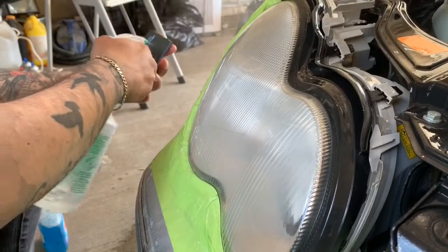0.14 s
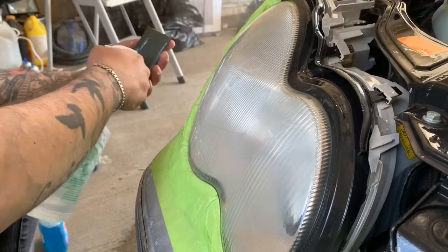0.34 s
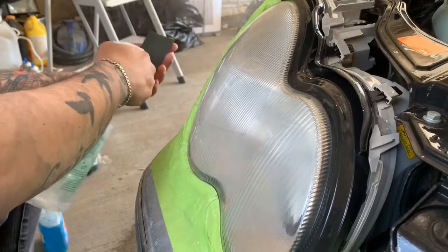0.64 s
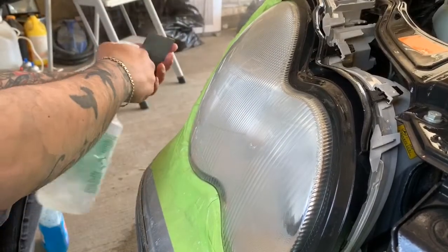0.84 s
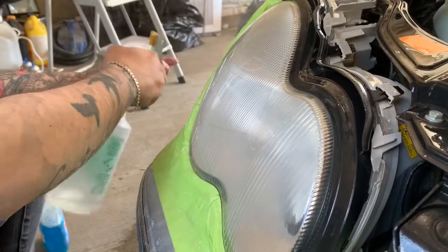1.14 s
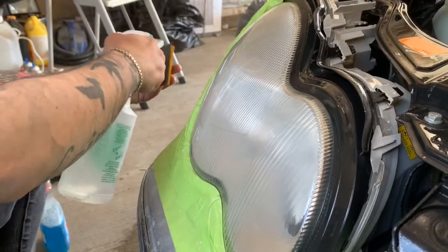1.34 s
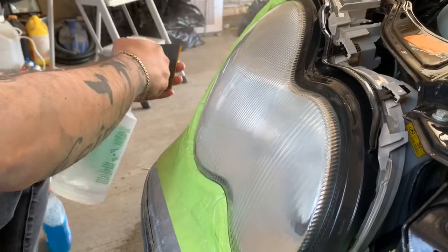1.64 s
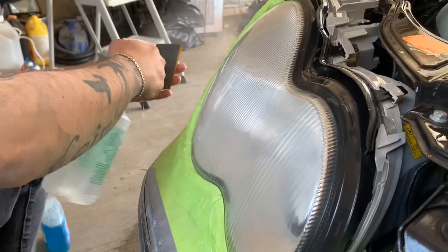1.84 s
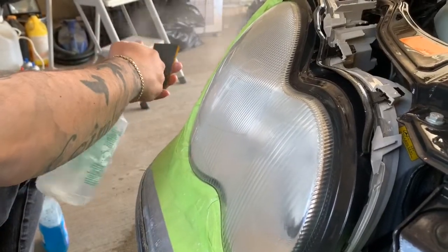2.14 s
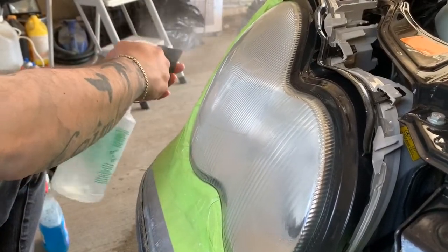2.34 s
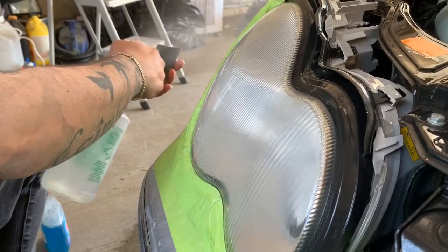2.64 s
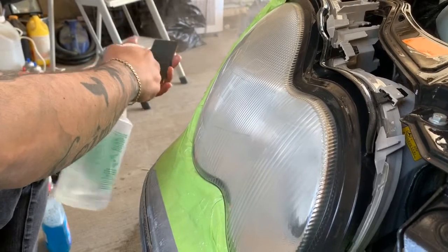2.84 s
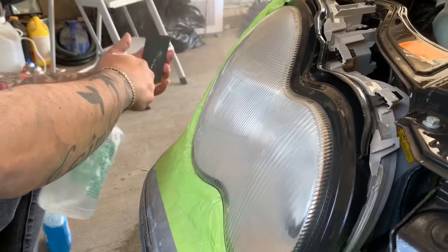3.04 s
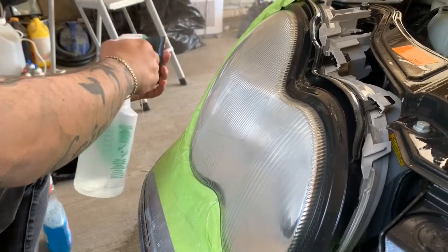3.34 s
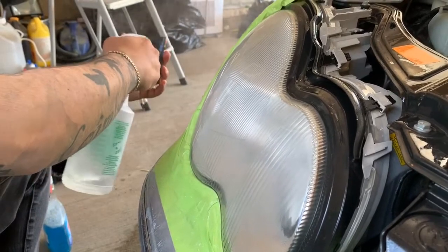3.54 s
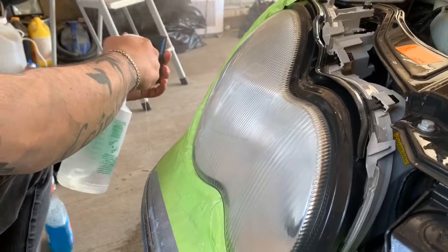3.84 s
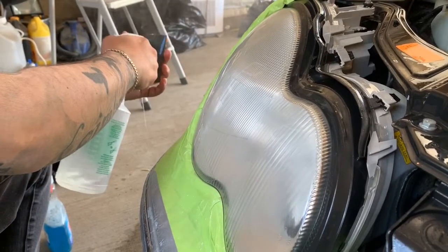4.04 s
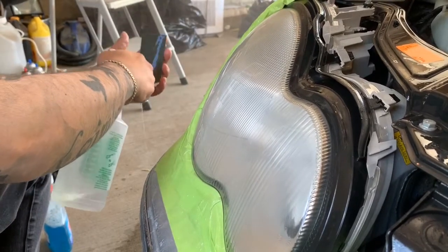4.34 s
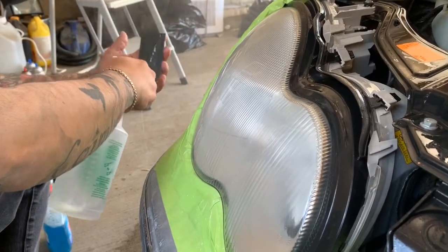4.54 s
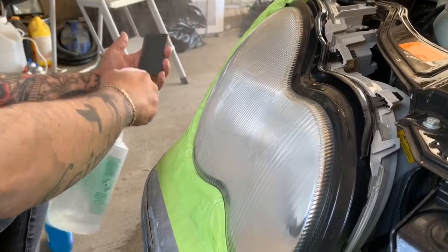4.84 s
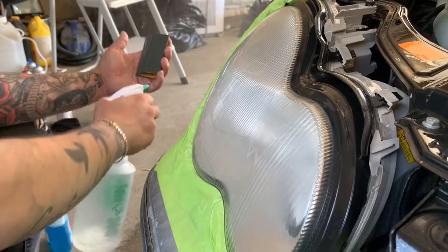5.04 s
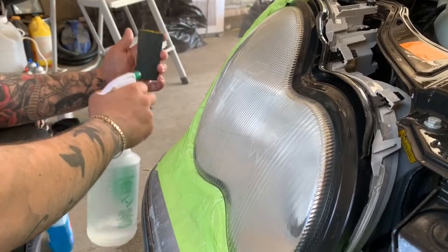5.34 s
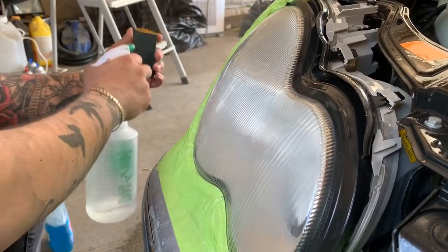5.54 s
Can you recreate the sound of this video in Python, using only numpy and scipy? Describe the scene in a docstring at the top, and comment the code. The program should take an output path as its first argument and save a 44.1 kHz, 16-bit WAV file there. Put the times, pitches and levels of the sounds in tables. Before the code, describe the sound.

Fourteen brisk squirts of water strike a sponge in a cupped hand, bright and hissy at first, hollower and more resonant later. Between them come airy suction, small gurgles and clicking plastic, loudest around the middle. A faint low drone, perhaps an engine outside, wavers from about two seconds over soft room noise. The sound is close, mono, and lightly reverberant; spraying stops before the end.

```python
"""A hand-trigger spray bottle squirts water at a sponge held in a cupped hand, in a garage, in mono.
Pulls hiss, and most thump the bottle: shaped noise under a pressure curve, coloured by nozzle and hand.
Releases suck liquid back up the pump: a softer wheeze of noise, with gurgles; struck plastic modes tick.
A low wavering drone of sine tones, perhaps an engine outside, comes and goes over noise for the room."""
import sys
import numpy as np
from scipy import signal
from scipy.fft import rfft, irfft, next_fast_len
from scipy.io import wavfile
from scipy.ndimage import uniform_filter1d, map_coordinates

SR = 44100
rng = np.random.default_rng(int(sys.argv[2]) if len(sys.argv) > 2 else 0)


def generate_wav(signal):
    """Clip the signal to [-1, 1] and save it as 16-bit WAV at the path in sys.argv[1]."""
    frames = np.transpose(np.atleast_2d(signal))
    scaled = np.clip(frames, -1, 1) * 32767
    pcm = np.round(scaled).astype(np.int16)
    wavfile.write(sys.argv[1], SR, pcm)


N = 250576


def amp(db):
    """Decibels to gain."""
    return 10 ** (np.asarray(db) / 20)


def unit(x):
    """Scaled to rms 1."""
    return x / np.sqrt(np.mean(x ** 2) + 1e-20)


def along(points, hz):
    """Values at hz from (frequency [Hz], value) points, joined on a log frequency axis."""
    f, v = np.transpose(points)
    return np.interp(np.log(hz + 1), np.log(f + 1), v)


def curves(rows):
    """One value per sample for each column after the time."""
    s, *cols = np.transpose(rows)
    return [np.interp(np.arange(N) / SR, s, c) for c in cols]


def strokes(tables, opens_s, closes_s):
    """Curves of separate strokes: a gain that opens fast and is silent around each, then the other columns."""
    rows = []
    for table in tables:
        first, last = table[0], table[-1]
        before = (first[0] - opens_s, -100, *first[2:])
        after = (last[0] + closes_s, -100, *last[2:])
        rows += [before, *table, after]
    rows = np.array(sorted(map(tuple, rows)))
    rows[:, 1] = amp(rows[:, 1] / 2)  # fades run straight in the square root of gain
    root, *others = curves(rows)
    return root ** 2, *others


def wobble(rate):
    """A smooth random curve, rate knots a second."""
    knots = rng.standard_normal(int(N * rate / SR) + 4)
    return map_coordinates(knots, [np.arange(N) * rate / SR])


def filtered(x, response):
    """x times a complex response of frequency."""
    m = next_fast_len(N + SR // 2)
    return irfft(rfft(x, m) * response(np.fft.rfftfreq(m, 1 / SR)), m)[..., :N]


def hiss(spectrum, sputter_db=0):
    """Coloured noise of rms 1 whose strength can sputter from one millisecond to the next."""
    sputtering = rng.standard_normal(N) * amp(sputter_db * wobble(700))
    return unit(filtered(sputtering, lambda hz: amp(along(spectrum, hz))))


def resonance(f, hz, width_hz):
    """Response of one resonant stage, 1 at its centre."""
    return 1j * f * width_hz / (hz * hz - f * f + 1j * f * width_hz)


def band(hz, width_hz):
    """Noise of rms 1 through a steep resonance: two equal stages of the given width."""
    return unit(filtered(rng.standard_normal(N), lambda f: resonance(f, hz, width_hz) ** 2))


def with_moving_peak(x, centre_hz, width, boost_db):
    """x with a resonance that follows centre_hz, and patches of random gain."""
    hz, t, z = signal.stft(x, SR, nperseg=256)
    at = np.minimum((t * SR).astype(int), N - 1)
    bump = np.exp(-(np.log((hz[:, None] + 1) / centre_hz[at]) / width) ** 2)
    smooth_hz = uniform_filter1d(rng.standard_normal(z.shape), 3, 0)
    patches = unit(uniform_filter1d(smooth_hz, 12, 1))
    shaped = z * amp(boost_db[at] * bump + 1.2 * patches)
    return amp(-3) * signal.istft(shaped, SR, nperseg=256)[1][:N]


def struck(times, levels_db, pitches_hz, modes, crack, blur, attack_s):
    """Each blow rings the modes at new strengths, after a short crack; loose parts blur the ring."""
    out, t = np.zeros(N + SR), np.arange(SR // 16) / SR
    for s, db, hz in zip(times, levels_db, pitches_hz):
        ring = 0
        for k, level, t60 in modes:
            phase = 2 * np.pi * k * hz * t + blur * np.cumsum(rng.standard_normal(len(t)))
            strength_db = level + rng.normal(0, 1.9)
            ring = ring + amp(strength_db - 60 * t / t60) * np.sin(phase)
        snap = crack * amp(-60 * t / 0.00065) * rng.standard_normal(len(t))
        out[round(s * SR):][:len(t)] += amp(db) * (ring * (1 - np.exp(-t / attack_s)) + snap)
    return out[:N]


# colour of the room air: (frequency [Hz], relative level [dB])
AIR_SPECTRUM = [(90, -38), (130, -26), (250, -24.5), (1000, -35), (1400, -32), (1800, -33.5), (5000, -42.5),
                (8000, -52), (10000, -63), (13000, -55.5), (16000, -52)]
# colour of the rumble: (frequency [Hz], relative level [dB])
RUMBLE_SPECTRUM = [(12, -10), (20, 10.5), (43, -5), (59, -1), (100, -1), (151, -6), (200, -11.5),
                   (260, -13), (440, -120)]
# room noise over time: (time [s], air level [dB], rumble level [dB])
BACKGROUND_LEVELS = [(0, -61.5, -52.5), (1.3, -61.5, -56.5), (2, -61, -54.5), (3.3, -60.5, -60),
                     (4.5, -63.5, -54.5), (5.68, -62, -50)]


def background():
    """Room air and an uneven rumble: two shaped noises with slowly drifting levels."""
    air_db, rumble_db = curves(BACKGROUND_LEVELS)
    air = amp(air_db + 0.7 * wobble(24)) * hiss(AIR_SPECTRUM)
    rumble = amp(rumble_db + 0.58 * wobble(4.2)) * hiss(RUMBLE_SPECTRUM)
    return air + rumble


SUCK_IN_S, SUCK_OUT_S, SUCK_EDGE_DB = 0.013, 0.0124, -8  # the suction opens and closes
GURGLE_START_DB = -17.5  # re suction: air comes first, liquid follows


def release(s, length, start_db, end_db, gurgle_db, whistle_db):
    """The controls of one row: the suction opens, drifts and closes while the gurgle grows."""
    return [(s, start_db + SUCK_EDGE_DB, GURGLE_START_DB, whistle_db),
            (s + SUCK_IN_S, start_db, GURGLE_START_DB, whistle_db),
            (s + length, end_db, gurgle_db, whistle_db),
            (s + length + SUCK_OUT_S, end_db + SUCK_EDGE_DB, gurgle_db, whistle_db)]


# trigger releases; the last row is a faint rustle: (start [s], length [s], suction at start [dB],
# suction at end [dB], gurgle at end [dB re suction], valve whistle [dB re suction])
RELEASES_AND_RUSTLE = [(0.005, 0.032, -50.5, -53.5, 1, -13), (0.051, 0.064, -46.5, -54.5, 4.5, -12),
                       (0.345, 0.074, -48.5, -56, 5, -8), (0.715, 0.072, -49.5, -58.5, 6.5, -6),
                       (0.995, 0.091, -53, -53.5, -4, -6.5), (1.097, 0.105, -58, -72, 11, -2),
                       (1.618, 0.061, -44.5, -44.5, -1, -10), (1.918, 0.071, -47.5, -56.5, 0, -12),
                       (2.200, 0.071, -48, -43, -2.5, -3), (2.493, 0.064, -51, -41, -3.5, -6),
                       (2.77, 0.072, -49.5, -41.5, 4, -4), (3.061, 0.07, -45, -45, -9.5, -9),
                       (3.585, 0.09, -48.5, -58, -1, -9), (3.913, 0.069, -48, -58.5, -0.5, -19),
                       (4.262, 0.061, -48, -60, -6, -13), (4.575, 0.056, -48.5, -50, 4.5, -7.5),
                       (4.851, 0.057, -44.5, -46, -9.5, -7.5), (5.358, 0.078, -70, -68, 2, -7)]
# colour of the wheeze: (frequency [Hz], relative level [dB])
SUCTION_SPECTRUM = [(820, -44), (1400, -17), (1620, -14.5), (2030, -13), (2590, -2), (2840, -9),
                    (3210, -5.5), (3830, -12), (6660, -9.5), (10800, -25.5), (13700, -22), (15800, -28.5),
                    (16300, -20)]


def refill():
    """The spring pushes the piston back: air wheezes past the valve and liquid gurgles up the tube."""
    controls = [release(*row) for row in RELEASES_AND_RUSTLE]  # the rustle is made of the same noises
    suction, gurgle_db, whistle_db = strokes(controls, opens_s=.003, closes_s=.012)
    pops = rng.standard_normal(N) * amp(3.5 * wobble(150))
    gurgle = unit(filtered(pops, lambda f: resonance(f, 700, 500)))
    wheeze = amp(0.34 * wobble(140)) * hiss(SUCTION_SPECTRUM)
    whistle = amp(whistle_db) * band(3306, 280)
    return suction * (wheeze + whistle + amp(gurgle_db) * gurgle)


# trigger ticks: (time [s], strike level [dB], pitch [Hz], hollow knock [dB re tick], knock pitch [Hz])
TICKS = [(0.0565, -39.5, 2970, -15, 554), (0.1005, -36.5, 2750, -7, 616), (0.391, -35, 2750, -4, 607),
         (0.405, -28.5, 2620, -9, 600), (0.4236, -43, 2540, -5, 487), (0.459, -39, 1500, -15, 890),
         (0.472, -36, 2460, -12, 700), (0.719, -37, 3280, -21, 530), (0.745, -49, 3260, 6.5, 1006),
         (0.7721, -34, 3200, -9, 560), (1.067, -37, 2140, -17, 570), (1.109, -42, 2300, 4, 590),
         (1.1187, -34, 2500, 1.5, 570), (1.1445, -38, 2040, -4.5, 610), (1.184, -42, 2020, -6, 1260),
         (1.2044, -45.5, 1783, -7, 665), (1.6594, -46, 3300, -12, 778), (1.6793, -27, 2760, -12, 610),
         (1.715, -27, 3440, -7.5, 850), (1.7998, -27, 2980, -15.5, 640), (1.928, -30, 3230, -34, 850),
         (1.982, -36.5, 2050, -6, 452), (2.0108, -32, 2500, -10, 527), (2.027, -26, 3940, -5, 1150),
         (2.1845, -26.5, 3670, -18, 1250), (2.2652, -27, 2620, -19, 670), (2.5544, -24, 2614, -13, 620),
         (2.594, -24, 2170, -8, 906), (2.8372, -16, 3160, -10.5, 927), (2.866, -21, 2230, -14, 455),
         (3.168, -44, 3350, 8, 1010), (3.1873, -29, 3270, -17, 966), (3.2174, -34.5, 3950, -8, 486),
         (3.258, -26.5, 2172, -27, 584), (3.541, -32, 3396, -14, 1220), (3.911, -26.5, 2504, -33, 458),
         (3.9743, -48.5, 2540, -2, 528), (4.2674, -30, 3380, -22, 550), (4.6306, -37, 2585, 0, 445),
         (4.8625, -34.5, 2500, -10, 573), (4.8998, -42, 2297, -1, 687), (5.0505, -44, 3296, -25, 524.5),
         (5.4175, -47, 1970, -7, 1110), (5.669, -44.5, 1974, -25, 454.5)]
# plastic modes: (multiple of pitch, level [dB], t60 [s])
TRIGGER_MODES = [(.75, -9.5, 0.017), (0.999, 2, 0.019), (1.2, -8.5, 0.022), (1.5, -5.5, .012)]
# modes of the pump head: (multiple of pitch, level [dB], t60 [s])
PUMP_HEAD_MODES = [(1, 5.5, 0.036), (1.5, -15, 0.01)]
RATTLE_S, RATTLE_DB = .02, -12  # rattle delay before random scaling; loudest rattle re its tick


def trigger():
    """Plastic parts tick, knock and rattle on, dulled by the fingers around them."""
    s, db, tick_hz, knock_db, knock_hz = np.transpose(TICKS)
    ticks = struck(s, db, tick_hz, TRIGGER_MODES, crack=0.32, blur=0.18, attack_s=0.0014)
    knocks = struck(s, db + knock_db, knock_hz, PUMP_HEAD_MODES, crack=.08, blur=0.083, attack_s=0.0036)
    # two loose rattles after each tick, each weaker and at its own pitch
    late, size, bend = rng.random((len(s), 2, 3)).transpose(2, 1, 0)
    rattle_s = (s + RATTLE_S * (.2 + late)).ravel()
    rattle_db = (db + RATTLE_DB - 8 * size).ravel()
    rattle_hz = (tick_hz * (.5 + 0.61 * bend)).ravel()
    rattle = struck(rattle_s, rattle_db, rattle_hz, TRIGGER_MODES, crack=.25, blur=0.17, attack_s=0.00083)
    return filtered(ticks + knocks + rattle, lambda f: 1 / (1 + 1j * f / 5000) ** 2)


VALVE_S, VALVE_SHUT_DB = 0.015, -9.5  # the valve cracks open: time, jet at the start re the first spurt
DYING_S, DYING_DB = 0.034, -26.5  # the jet collapses after the stroke
# Five moments of a pull: start, valve open, full pressure, stroke end, collapse.
# changes to the pull's own cup ring, lower hand ring, mist and splatter: one (change [dB]) per moment
CUP_CHANGE = [-3.5, 2.5, -2.5, -2, -4]
PALM_CHANGE = [2, 6.5, -3, -1.5, 2]
MIST_CHANGE = [3, -0.5, -0.45, 1, 4]
SPLATTER_CHANGE = [17, 9, -0.5, 3, -3]
# nozzle resonance: one (multiple of its dB strength) per moment
NOZZLE_MULTIPLE = [0, 1.5, 0.97, 0.95, 0]


def pull(s, build, length, db, spurt_db, change_db, start_hz, end_hz, nozzle_db,
         cup_db, palm_db, mist_db, splatter_db):
    """The controls at the five moments of one pull: pressure builds, holds and collapses."""
    after = np.array([0, VALVE_S, build, length, length + DYING_S])
    jet_db = db + np.array([spurt_db + VALVE_SHUT_DB, spurt_db, 0, change_db, change_db + DYING_DB])
    nozzle_hz = np.interp(after, [0, length], [start_hz, end_hz])
    own_db = np.array([[cup_db], [palm_db], [mist_db], [splatter_db]])
    layers_db = own_db + [CUP_CHANGE, PALM_CHANGE, MIST_CHANGE, SPLATTER_CHANGE]
    peak_db = nozzle_db * np.array(NOZZLE_MULTIPLE)
    return np.transpose([s + after, jet_db, nozzle_hz, peak_db, *layers_db]).tolist()


# trigger pulls: (start [s], time to full pressure [s], stroke length [s], jet drive at full pressure [dB],
# first spurt [dB re that], change until the stroke ends [dB], nozzle resonance at start [Hz], at end [Hz],
# its strength [dB], cupped-hand ring, hand's lower ring, mist, splatter [each dB re jet, before changes])
PULLS = [(0.139, 0.034, 0.081, -29.5, -10, 2, 3850, 3530, 5, -11.5, -21, -16.5, -21),
         (0.484, 0.045, 0.096, -33, -11.5, 1.5, 3430, 3720, 3, -9.5, -20, -14.5, -20.5),
         (0.815, 0.032, 0.086, -30, -10.5, -0.5, 3800, 3600, 2, -9, -19, -15, -18.5),
         (1.402, 0.021, 0.081, -36.5, -5, 2, 4800, 3920, 7, -23, -17.5, -14, -20),
         (1.711, 0.057, 0.093, -31.5, -8.5, -3.5, 3660, 3680, 4.5, -10, -17.5, -14.5, -18.5),
         (2.016, 0.05, 0.088, -30.5, -7.5, 0, 3730, 3600, 5, -8.5, -18, -15, -20),
         (2.299, 0.034, 0.088, -32, -3.5, 1, 3660, 3500, 5.5, -8, -18, -15.5, -18),
         (2.583, 0.059, 0.094, -32, -6, -1, 3544, 3200, 5, -3.5, -18.5, -15.5, -17.5),
         (2.864, .030, 0.082, -33, -4, 2, 3800, 3470, 5, 4.5, -15, -15, -17),
         (3.354, 0.041, .092, -32.5, -10.5, 3, 3560, 3400, 3.5, -1, -14.5, -16.5, -20.5),
         (3.688, .034, 0.089, -30, -7.5, 3.5, 3212, 3440, 6.5, -0.5, -9.5, -17, -22),
         (4.032, 0.035, 0.087, -29, -7, 3, 3500, 3280, 7, 0, -10, -19, -21.5),
         (4.361, 0.043, 0.094, -27, -10.5, 1.5, 3630, 3830, 3.5, 1, -16.5, -20, -25),
         (4.658, .020, 0.087, -29.5, -3.5, -1.5, 3890, 3500, 4, 1.5, -11.5, -18, -20.5)]
# colour of the droplets: (frequency [Hz], relative level [dB])
JET_SPECTRUM = [(1000, -33), (1700, -29), (2100, -9), (3060, -7), (3840, -3.5), (4540, -6.5), (7230, -10.5),
                (10500, -28.5), (13600, -66), (22000, -120)]
# colour of the fine mist: (frequency [Hz], relative level [dB])
MIST_SPECTRUM = [(5590, -13), (9500, -29), (11200, -9.5), (13900, -1), (15600, -5), (16300, -13)]
# colour of the splatter: (frequency [Hz], relative level [dB])
SPLATTER_SPECTRUM = [(120, -33), (200, -5), (274, -3.5), (916, -2.5), (1200, -1), (1560, -26), (2640, -120)]
# air in the cupped hand, main ring then lower ring: (frequency [Hz], width of one stage [Hz])
HAND_RINGS = [(2155, 475), (1527, 590)]


def spray():
    """The jet tears into droplets; the hand behind the sponge rings with it, a fine mist hisses above."""
    controls = [pull(*row) for row in PULLS]
    jet, nozzle_hz, nozzle_db, cup_db, palm_db, mist_db, splatter_db = strokes(
        controls, opens_s=0.0036, closes_s=.012)
    tremble_db = .9 * wobble(60) + 1.6 * wobble(300)
    surge = jet * amp(tremble_db)  # the pressure trembles and air pockets spit
    droplets = hiss(JET_SPECTRUM, sputter_db=-2) + amp(-9) * band(2816, 480) + amp(-14.0) * band(5000, 600)
    open_air = with_moving_peak(droplets, nozzle_hz, width=0.18, boost_db=nozzle_db)
    open_air += amp(mist_db + 1.1 * wobble(37)) * hiss(MIST_SPECTRUM, sputter_db=0.5)
    open_air += amp(palm_db) * band(*HAND_RINGS[1])
    cup = amp(cup_db) * band(*HAND_RINGS[0])
    splatter = amp(splatter_db) * hiss(SPLATTER_SPECTRUM, sputter_db=-1.0)
    return surge * open_air, surge * (cup + splatter)


# bottle thumps, mostly as the piston starts, one at the end of a stroke: (time [s], strike level [dB])
THUMPS = [(0.143, -36.5), (0.489, -40), (0.816, -43), (1.482, -46), (1.719, -34.5), (2.022, -42),
          (2.312, -33), (2.594, -31), (2.87, -31.5), (3.687, -38), (4.031, -43), (4.365, -44.5),
          (4.661, -38)]
# modes of the bottle wall: (multiple of pitch, level [dB], t60 [s])
BOTTLE_MODES = [(1, 5, 0.062), (.8, -1, 0.062), (.65, -20, 0.017)]
BOTTLE_HZ = 264.7


def bottle_wall():
    """The bottle thumps, mostly as the piston starts, once at a stroke's end: a blow rings its wall's modes."""
    s, db = np.transpose(THUMPS)
    pitch_hz = np.full(len(s), BOTTLE_HZ)
    return struck(s, db, pitch_hz, BOTTLE_MODES, crack=.1, blur=.012, attack_s=0.0034)


# low tone: (time [s], pitch [Hz], level [dB])
LOW_TONE = [(1.3, 54.6, -64), (1.69, 54.7, -51), (1.82, 60.9, -47.5), (1.92, 59, -43.5), (2.06, 57.9, -32),
            (2.21, 57.4, -49), (2.36, 57.7, -33.5), (2.63, 57.2, -37.5), (3.01, 57.35, -34.5),
            (3.25, 56.2, -38), (3.32, 55.6, -47), (3.56, 55.87, -39), (3.6, 55.87, -60), (3.65, 55.94, -41),
            (3.74, 54.8, -64), (3.89, 53.07, -41.5), (4.02, 53.36, -48), (4.04, 53.2, -41),
            (4.23, 53.05, -63), (4.36, 55.9, -43.5), (4.47, 57.36, -50), (4.57, 57.66, -35),
            (4.81, 57.35, -35.5), (4.9, 55.56, -42.5), (5.14, 55.9, -39), (5.68, 55.8, -48)]
# tone near its octave: (time [s], pitch [Hz], level [dB])
UPPER_TONE = [(1.6, 110.5, -71), (2.23, 112, -49), (2.48, 118.7, -52), (2.53, 117, -62), (2.6, 112.2, -44),
              (2.85, 113.4, -66), (3.17, 113.5, -46.5), (3.5, 110.6, -43.5), (3.79, 110.4, -53),
              (3.86, 107.9, -63), (4.05, 109.9, -48.5), (4.25, 109.3, -58.5), (4.48, 110, -44.5),
              (4.75, 111, -59), (4.88, 110.6, -44), (5.68, 110.1, -47.5)]
# faint orders: (multiple of the low pitch)
ORDERS = np.array([2, 4, 5, 7, 8, 10, 11, 15]) / 3
# level of each order once faded in: (level [dB])
ORDER_LEVELS = [-61, -55, -61.5, -65.5, -66.5, -73, -67.5, -72.5]
# the source draws near and its orders fade in, start then end: (time [s])
NEAR_TIMES = [1.3, 1.86]
FLUTTER_DB = 1.5  # both tones flutter


def drone():
    """A low tone and one near its octave, each swelling on its own, with faint unsteady orders of the low one."""
    pitch_hz, low_db = curves([(0, 55, -90), *LOW_TONE])
    upper_hz, upper_db = curves([(0, 100, -90), *UPPER_TONE])
    phase = 2 * np.pi * np.cumsum(pitch_hz) / SR
    upper_phase = 2 * np.pi * np.cumsum(upper_hz) / SR
    tone = amp(low_db + FLUTTER_DB * wobble(12)) * np.sin(phase)
    tone += amp(upper_db + FLUTTER_DB * wobble(15)) * np.sin(upper_phase)
    near = np.interp(np.arange(N) / SR, NEAR_TIMES, [0, 1])
    for order, db in zip(ORDERS, ORDER_LEVELS):
        tone += near * amp(db + 2.5 * wobble(7)) * np.sin(order * phase + 1.5 * wobble(7))
    return np.sqrt(2) * tone  # so that levels are rms


# reverberation of the garage: (frequency [Hz], t60 [s])
GARAGE_DECAY = [(300, 0.87), (1000, 0.18), (2000, 0.32), (4000, 0.27), (7000, 0.31), (10000, 0.3),
                (15000, 0.19)]


def garage(x):
    """Each frequency of the room's answer, a decaying noise, dies at its own speed."""
    hz, t, z = signal.stft(rng.standard_normal(SR // 2), SR, nperseg=256)
    decay = amp(-60 * t / along(GARAGE_DECAY, hz)[:, None])
    tail = signal.istft(z * decay, SR, nperseg=256)[1]
    delayed = np.pad(x, (300, 0))  # samples before the walls answer
    return signal.fftconvolve(delayed, tail / np.linalg.norm(tail))[:N]


def scene():
    """Bottle with its room, drone and background, the same in both channels."""
    open_air, shielded = spray()
    free, held = open_air + refill(), shielded + trigger()
    leak = amp(-8) * held  # what sounds inside the hands reaches the walls weaker
    bottle = free + held + amp(-7.0) * garage(free + leak) + bottle_wall()
    return np.tile(bottle + drone() + background(), (2, 1))


def record(dry):
    """Nothing is kept from 16 kHz up."""
    return filtered(dry, lambda hz: hz < 16000)


dry = scene()
out = record(dry)
generate_wav(out)
```